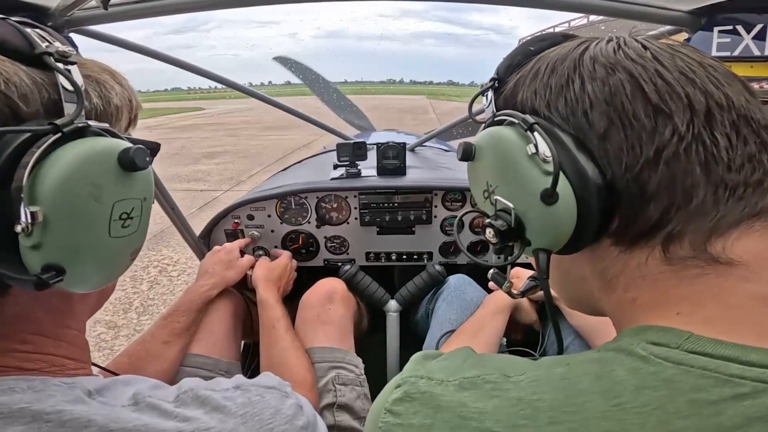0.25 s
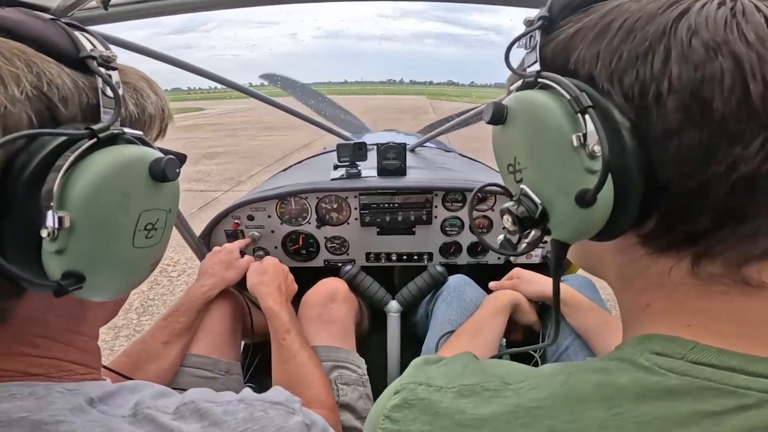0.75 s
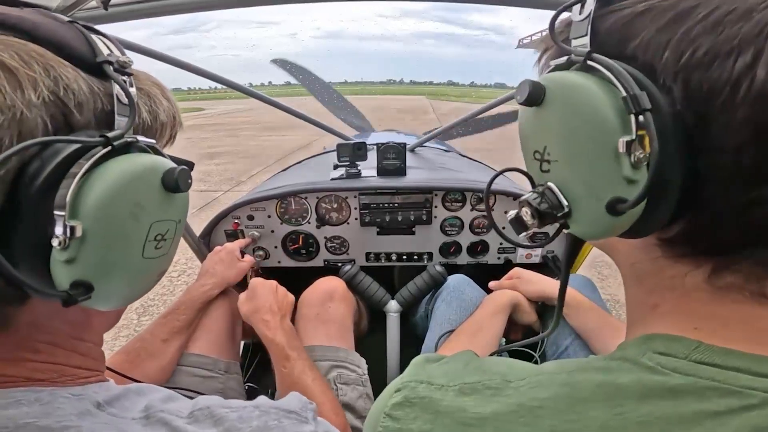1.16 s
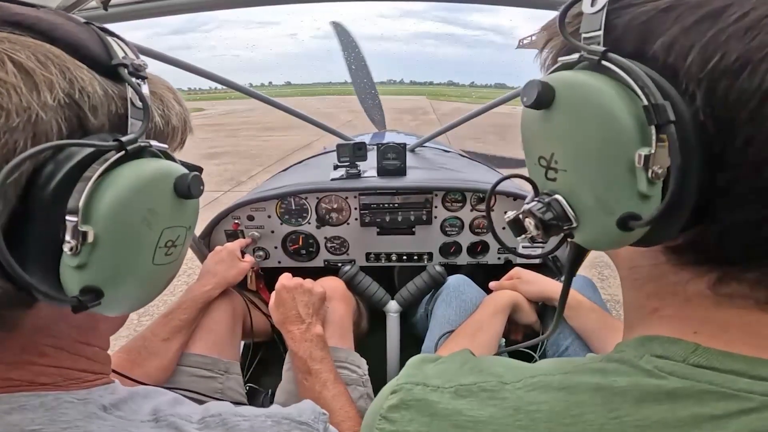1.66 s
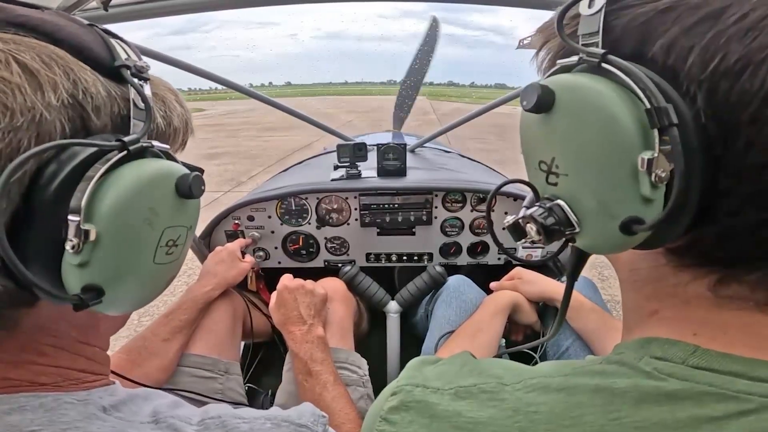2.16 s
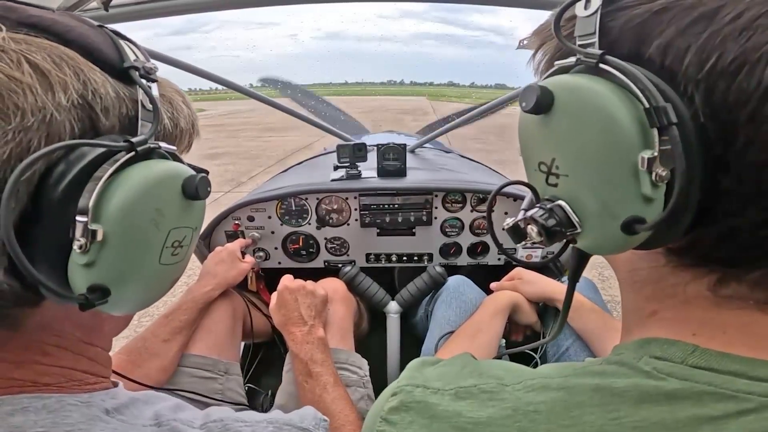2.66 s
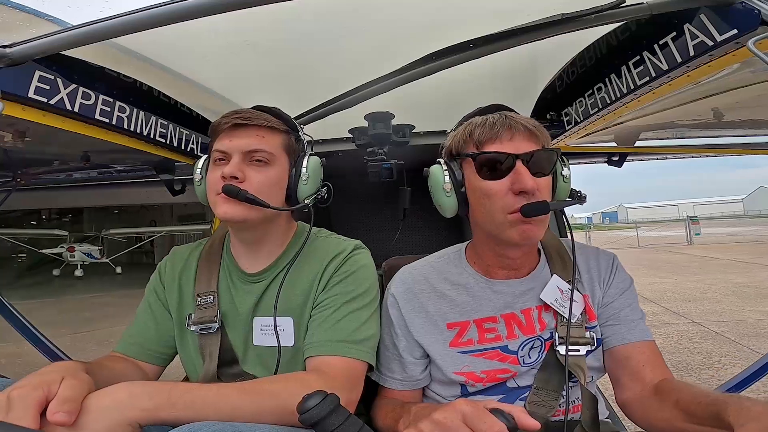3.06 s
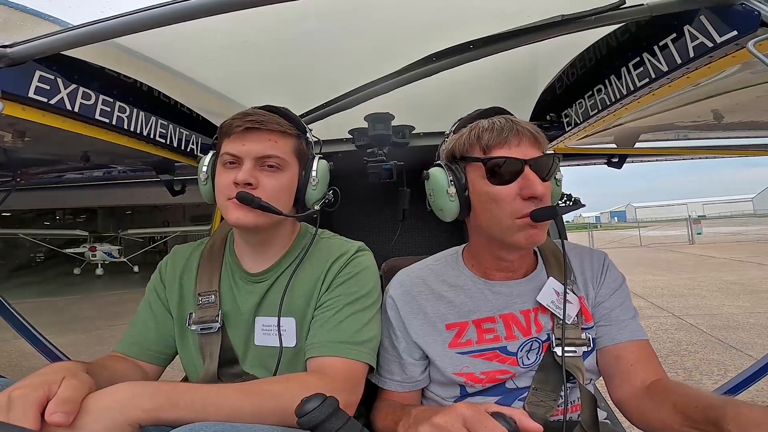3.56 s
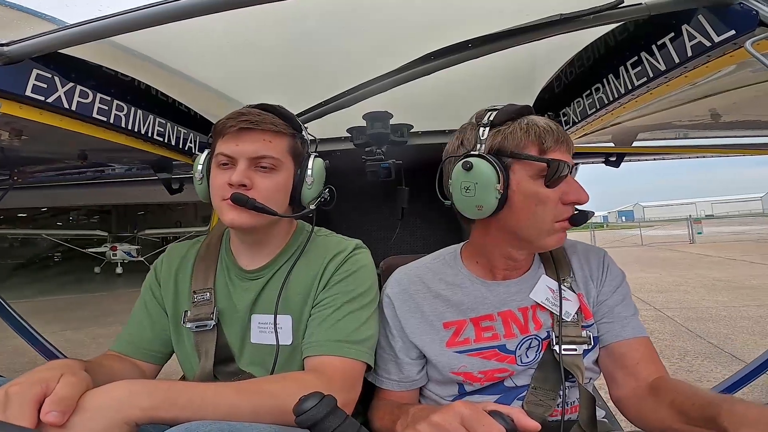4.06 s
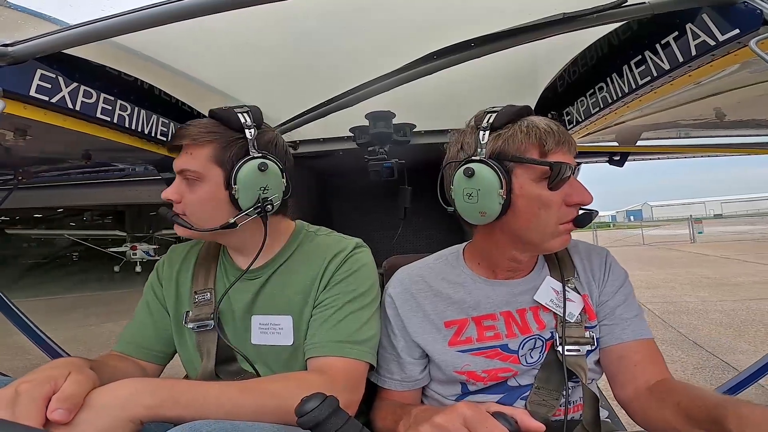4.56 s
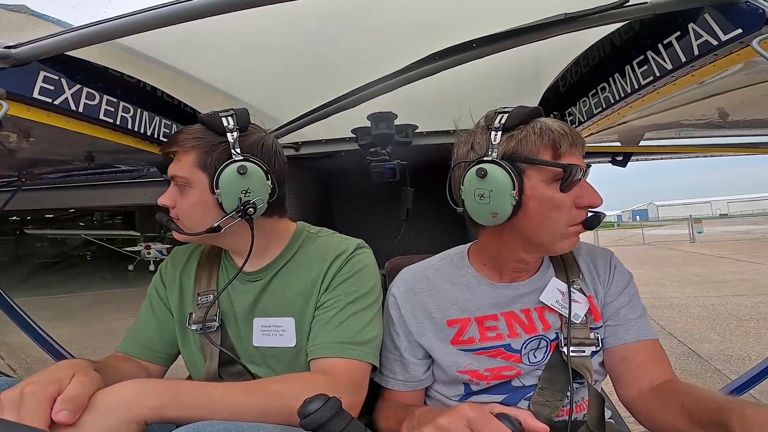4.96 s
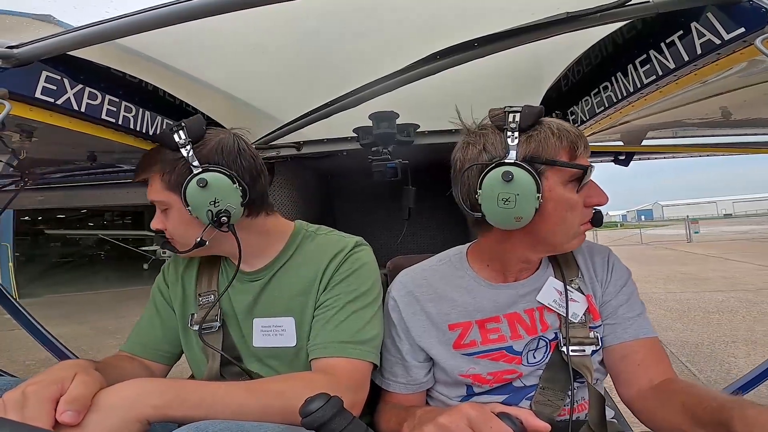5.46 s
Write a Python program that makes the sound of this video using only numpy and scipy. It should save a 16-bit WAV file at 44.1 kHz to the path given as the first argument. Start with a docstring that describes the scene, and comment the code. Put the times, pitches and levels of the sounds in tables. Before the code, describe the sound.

A small propeller plane's engine catches and speeds up with booming and rattling, then abruptly turns duller at a fast idle, heard inside the cabin.

```python
"""A four-cylinder light aircraft engine, heard inside the cabin, in stereo from behind the seats.
It catches and picks up speed: each firing booms, shakes the panels and clatters. The propeller gears
rattle, most while the engine is slow, and then a loose fitting chatters as it speeds up.
Halfway, with a tick, the sound jumps to a dull, nearly mono microphone on the instrument panel.
There the engine runs at a fast idle and sags a little."""
import sys
import numpy as np
from scipy import signal
from scipy.fft import rfft, irfft
from scipy.io import wavfile
from scipy.ndimage import uniform_filter1d

SR = 44100
rng = np.random.default_rng(int(sys.argv[2]) if len(sys.argv) > 2 else 0)


def log_audio(samples):
    """Write samples as a 16-bit WAV file to the path given in sys.argv[1]."""
    # one column per channel
    frames = np.atleast_2d(samples).T
    # limit to full scale, then quantise
    limited = np.clip(frames, -1, 1)
    pcm = np.round(limited * 32767).astype(np.int16)
    wavfile.write(sys.argv[1], SR, pcm)


N = 251370
TIME = np.arange(N) / SR
FREQS = np.maximum(np.arange(N // 2 + 1) * SR / N, 1)
SIDES = np.array([[1], [-1]])   # left, right


# The boom's tones. Each row: multiple of the firing rate, depth of its chugging in dB.
BOOM_TONES = [(.75, 4), (1, 0), (2, 2.5), (2.5, 0.5)]
# Each swells as it passes a cabin resonance. Each row: time in seconds, then each tone's gain in dB.
BOOM_SWELLS = [(0.1, -44, -39, -28, -34.2), (0.3, -42.0, -27, -34, -41), (0.45, -42.0, -26.0, -31.5, -33),
               (0.6, -40, -25.5, -33, -49), (0.75, -42.0, -24.5, -25, -31.5), (1, -48, -25.5, -29.5, -31),
               (1.2, -52, -26.5, -30, -32.9), (1.45, -40, -25.5, -29.5, -30.5),
               (1.62, -39, -22.5, -40, -30.3), (1.8, -33, -22.5, -38, -44), (2, -40, -22, -28, -41),
               (2.2, -32.0, -25, -30, -28), (2.35, -35.5, -20.5, -31, -44), (2.5, -30, -30, -25, -34),
               (2.65, -25.5, -38, -24, -38), (2.76, -25, -27, -25.5, -39)]
def boom(fired):
    """Low tones chug with the uneven combustion. `fired` is the running count of firings."""
    out = from_db(-36.5 + 2 * drift(8.9)) * tone(fired, 1.5)   # a weaker off-beat tone
    for (multiple, chug_db), db in zip(BOOM_TONES, in_time(BOOM_SWELLS)):
        out += from_db(db + 0.96 + chug_db * drift(18)) * tone(fired, multiple)
    return out


# The rumble behind the seats. Each row: frequency in Hz, gain in dB.
REAR_RUMBLE_COLOUR = [(14, -25), (23, 2), (34, -16), (60, 1), (100, -3), (135, -1), (170, -3.5), (280, -4),
                      (330, -5.5), (370, -11.5), (480, -9.5), (550, -18), (620, -19), (720, -53)]
# The engine catches, labours and eases. Each row: time in seconds, gain in dB.
REAR_RUMBLE_SWELLS = [(0, 6.5), (0.14, 3), (0.36, 3.5), (0.5, 0.7), (0.65, -1), (0.76, -0.6), (1.08, -1.5),
                      (1.17, 0.6), (1.35, -2), (1.65, 0), (1.83, -1), (1.95, -1.5), (2.15, 0.3), (2.33, 0),
                      (2.68, 1), (2.82, -1.2)]
def rear_rumble(fired):
    """The firings shake the cabin into a low rumble."""
    shake = bursts(fired, uneven_db=-6, decay_s=0.0066, steady_db=11, jitter_s=0.003)
    shake += from_db(-10) * skin_ring(fired, uneven_db=1, decay_s=0.0075, jitter_s=0.00038)
    swell_db, = in_time(REAR_RUMBLE_SWELLS)
    return from_db(-22.5 + swell_db) * evened(colour(spread(shake), REAR_RUMBLE_COLOUR))


# Clean engine tones. Each row: multiple of the firing rate, level in dB against the rumbling noise.
IDLE_TONES = [(1, -30.5), (2, -22.5), (4, -11), (8, -26), (11, -20.5), (12, -22), (14, -27.5)]
# The rumble at the panel. Each row: frequency in Hz, gain in dB.
PANEL_RUMBLE_COLOUR = [(15, -24), (40, -26), (65, -14), (100, -11.5), (135, -4.5), (190, -1.5), (260, 1),
                       (315, -3.5), (350, -7), (450, -7), (530, -13), (565, -28.5), (620, -12.5),
                       (720, -39)]
# How its low and upper parts churn. Each row: time in seconds, gain in dB.
LOW_SWELLS = [(2.88, 3.5), (2.92, 0.5), (3.03, -2), (3.23, 1.8), (3.29, 3), (3.41, 0), (3.77, 2.5),
              (3.92, -0.6), (4.25, 0.5), (4.35, 1), (4.42, -3.5), (4.51, 4), (4.6, -1), (4.82, -2.6),
              (4.89, 1), (5.03, -6), (5.12, 0.5), (5.25, -3), (5.39, 1.3), (5.52, 0.5), (5.59, -4),
              (5.68, 0.1)]
UPPER_SWELLS = [(2.88, 0.1), (3.06, 1), (3.21, -1.3), (3.39, 1), (3.57, 1), (3.73, -0.2), (3.85, -0.8),
                (3.97, 0.3), (4.12, 0), (4.25, -1), (4.43, 0.9), (4.61, 1.7), (4.77, -0.5), (4.85, 2.2),
                (4.95, -0.7), (5.06, 0.5), (5.12, -1.5), (5.34, -1.2), (5.47, -2), (5.68, -2)]
def panel_rumble(fired, split_hz=225):
    """The idle shakes the cabin; the low and upper rumble swell and sink out of step."""
    tones = sum(from_db(db + 2.3 * drift(4.3)) * tone(fired, multiple) for multiple, db in IDLE_TONES)
    shake = bursts(fired, uneven_db=2.5, decay_s=0.0079, steady_db=4, jitter_s=0.00057)
    shake += from_db(-7.5) * skin_ring(fired, uneven_db=4.5, decay_s=0.021, jitter_s=0.00023)
    rumble = colour(shake[0], PANEL_RUMBLE_COLOUR) + tones
    low = irfft(rfft(rumble) / (1 + (FREQS / split_hz) ** 16), N)
    low_db, upper_db = in_time(LOW_SWELLS) + in_time(UPPER_SWELLS)
    return (from_db(-32 + low_db) * evened(low, window_s=0.14)
            + from_db(-31 + upper_db) * evened(rumble - low, window_s=0.11))


def cabin_drone(fired, rate):
    """The cabin air drones when an engine tone passes through its resonance."""
    air = ring(firings(fired, uneven_db=3.5, jitter_s=0.00016), hz=131, ring_s=0.56)
    return with_speed(rate, -48, db_per_doubling=-7) * surge(db=22, decay_s=1) * rms_one(air)


# The clatter behind the seats. Each row: frequency in Hz, gain in dB.
REAR_CLATTER_COLOUR = [(350, -53), (600, 1), (820, -6.5), (884, -4), (1100, -5), (1280, -9.5), (1390, -7),
                       (1580, -11.5), (2000, -14.5), (2600, -24.5), (4400, -120)]
# Resonances there, shared with the hiss. Each row: centre in Hz, width in Hz, lift in dB.
REAR_RESONANCES = [(1132, 52, 4.5), (2130, 67, 0), (2454, 25, 4), (2570, 54, 1.5), (2740, 61, 3),
                   (3130, 140, 4), (3440, 40, 6.5), (3966, 64, 10.5), (4230, 160, 11.5), (4340, 90, 7),
                   (5470, 100, 9), (6120, 72, 6), (6540, 110, 6), (6680, 74, -12)]
# The clatter's rise and fall. Each row: time in seconds, gain in dB.
REAR_CLATTER_SWELLS = [(0, 4), (0.14, 3.5), (0.23, -4.5), (0.45, -3.5), (0.62, -3), (0.9, -0.3), (1.08, -1),
                       (1.45, -0.6), (1.78, 1.5), (1.9, 1), (2.35, 1), (2.82, 1.9)]
def rear_clatter(fired):
    """The valves clatter with every firing."""
    valves = spread(bursts(fired, uneven_db=4.5, decay_s=0.007, steady_db=4, jitter_s=0.0022))
    swell_db, = in_time(REAR_CLATTER_SWELLS)
    return from_db(-35 + swell_db) * evened(colour(valves, REAR_CLATTER_COLOUR, REAR_RESONANCES))


# The clatter at the panel. Each row: frequency in Hz, gain in dB.
PANEL_CLATTER_COLOUR = [(350, -25.5), (600, -1.5), (734, 1), (804, -3.5), (911, -2.5), (983, -5),
                        (1160, -0.5), (1320, -7), (1520, -4.5), (2000, -14), (2600, -48), (4400, -120)]
# Resonances there, shared with the hiss. Each row: centre in Hz, width in Hz, lift in dB.
PANEL_RESONANCES = [(926, 40, 3.9), (1043, 34, 5.1), (3070, 220, 11), (3820, 210, 5.8), (4620, 200, 5.5)]
# The clatter's rise and fall. Each row: time in seconds, gain in dB.
PANEL_CLATTER_SWELLS = [(2.84, 0.68), (3.1, 1.1), (3.5, 0.29), (3.95, -0.93), (4.3, -0.78), (4.45, -1.6),
                        (4.7, 0.55), (5.1, -0.4), (5.35, 0.23), (5.69, 0.074)]
def panel_clatter(fired):
    """The valves clatter at idle and the cabin skin rings along."""
    valves = bursts(fired, uneven_db=4, decay_s=0.0049, steady_db=6, jitter_s=0.002)
    valves += from_db(-8.5) * skin_ring(fired, uneven_db=6, decay_s=0.0088, jitter_s=0.0001)
    swell_db, = in_time(PANEL_CLATTER_SWELLS)
    return from_db(-38.5 + swell_db) * colour(valves[0], PANEL_CLATTER_COLOUR, PANEL_RESONANCES)


# Raps that stand out of the clatter. Each row: start in seconds, relative level in dB.
RAPS = [(0.048, -19), (0.16, -22), (0.306, -25.5), (0.757, -24.5), (0.898, -20), (1.079, -21),
        (1.193, -26.5), (1.299, -25.5), (1.364, -22.5), (1.547, -23), (1.721, -24.5), (1.787, -19),
        (1.868, -30), (1.992, -23), (2.062, -22), (2.125, -24.5), (2.271, -21.5), (2.33, -25.5),
        (2.376, -23.5), (2.433, -18.5), (2.816, -21.5), (2.898, -23.5), (2.94, -24), (3.083, -21.5),
        (3.181, -25), (3.403, -25.5), (3.575, -30), (4.54, -23.5), (4.63, -25), (4.697, -22.5),
        (4.831, -24), (4.857, -26), (4.897, -28.5), (5.369, -26), (5.416, -23.5), (5.64, -25)]
# The sound of a rap. Each row: frequency in Hz, gain in dB.
RAP_COLOUR = [(250, 1.5), (450, 0.5), (700, 7), (850, 2), (1130, 6), (1350, -6), (1600, -3.5),
              (2100, -10.5), (3200, -22)]
def hard_firings(decay_s):
    """Now and then a cylinder fires harder and raps the firewall."""
    start_s, level_db = np.transpose(RAPS)
    return puffs(clicks_at(start_s, level_db), decay_s, RAP_COLOUR)


# Heavy lumps of combustion. Each row: start in seconds, strength in dB.
LUMPS = [(0.1, -36), (0.304, -19), (0.345, -20), (.47, -16), (.545, -13.5), (0.646, -13.5), (.685, -19),
         (1.145, -27), (1.809, -16), (2.114, -21.5), (2.703, -22), (2.897, -21), (2.94, -20), (3.224, -20),
         (3.285, -22), (3.337, -19), (3.574, -16), (3.759, -26), (3.994, -24), (4.09, -19.5), (4.475, -20),
         (4.713, -20), (5.044, -21), (5.245, -25.5)]
# The notes of the cabin skin. Each row: pitch in Hz, gain in dB, ring time in seconds.
SKIN_NOTES = [(161, -11.5, 0.046), (216, -11, 0.078), (272.6, -5, 0.13), (301, -9.5, 0.17),
              (426, -13, 0.06)]
def thumps(vary_db=2.5):
    """Each lump thumps the cabin skin, ringing every note with a strength of its own."""
    start_s, strength_db = np.transpose(LUMPS)
    out = 0
    for hz, gain_db, ring_s in SKIN_NOTES:
        chance_db = vary_db * np.clip(rng.standard_normal(len(start_s)), -2, 2)
        out = out - ring(clicks_at(start_s, strength_db + gain_db + chance_db), hz, ring_s)
    return signal.sosfilt(signal.butter(2, [120, 1500], "band", fs=SR, output="sos"), out)


# Loud knocks. Each row: start in seconds, strength in dB, left over right in dB,
# pitch of its chink in Hz, level of the chink in dB against the knock.
LOUD_KNOCKS = [(.002, -18.5, 7, 3380, -17), (0.02, -26, 3, 4440, 2), (0.04, -25, 10, 2180, -5),
               (.0672, -27.5, 14, 2180, 1), (.0844, -25, 11, 2217, 0), (0.1088, -28, 12, 2190, -8),
               (.135, -31, 5, 3640, -5), (0.163, -25.5, 10, 2126, -5), (0.1747, -32, 5, 2480, -10),
               (0.186, -27, 8, 2300, -9), (0.2196, -34, 8, 7100, -15), (0.263, -34, 9, 7060, -12),
               (.3222, -33, 8, 2000, -5.5), (0.341, -27, 8, 6900, -16), (.356, -35, 4, 6800, -10),
               (0.3897, -25.5, 7.5, 2840, -6), (.4272, -26.5, 9, 2100, -13), (.4494, -33.5, 11, 2180, -7),
               (.4888, -32, 10, 2490, -12), (.5, -32.5, 6, 2170, -4), (.517, -31, 10, 2820, -2),
               (0.539, -29.5, 7, 2730, -12), (0.571, -30, 3, 3400, -11), (.6325, -33, 4, 2100, -4),
               (0.6454, -36, 8, 2100, -5), (.6719, -31, 12, 2110, -0.5), (0.693, -28, 8, 6900, -19),
               (.7168, -32, 8, 2100, -1), (.738, -29, 9, 2650, 2), (0.755, -27.5, 7, 6800, -12.5),
               (0.785, -27, 7, 2640, -9), (.8285, -44, 5, 5700, -12), (.8572, -26, 9, 2510, -5),
               (.9248, -34.5, 9, 7100, -14), (0.969, -27.5, 6, 7000, -20), (1.011, -42, 4, 7100, -10),
               (1.4145, -29, 4, 6800, -18), (1.5029, -35, 2, 3410, -8), (1.6764, -29, 0, 4008, -14),
               (1.7234, -39, 0, 6000, -7), (1.8092, -33, 9, 3400, -12), (1.852, -33, 3, 4500, -13),
               (1.938, -32, 2, 5900, -17), (2.0656, -31, 6, 2827, -6), (2.14, -25, 3.5, 2160, -4),
               (2.208, -25.5, 4, 6695, -18), (2.31, -29, 6, 6900, -18), (2.3517, -30, 7, 6000, -12),
               (2.392, -26, 5, 3150, -9), (2.4847, -42, 1, 4000, -12), (2.58, -30, 3, 2794, -9),
               (2.676, -30, 12, 2760, -2), (2.696, -33, 5, 6500, -8)]
# The notes of the gear case. Each row: pitch in Hz, gain in dB, ring time in seconds.
CASE_NOTES = [(2160, 9.5, 0.062), (2537, -1, 0.17), (2670, 6, 0.04), (2815, 14, 0.016), (3100, -15, 0.028),
              (3350, 1, 0.042), (3730, 0, .02), (3930, 10, 0.011), (4270, -15, .025), (4450, -5, 0.057),
              (4600, -10, .02), (5700, -30, .025), (6200, -11, .025), (6650, -7, .02), (6750, -4, 0.02),
              (7750, -20, .02)]
# The crack of a knock. Each row: frequency in Hz, gain in dB.
CRACK_COLOUR = [(1200, -32), (2100, 2.5), (3000, -0.5), (4600, 0), (5500, -8.5), (7800, -7), (9500, -22),
                (12800, -21.5), (14300, -55)]
def gear_knocks(ring_db=-22, crack_db=-11, vary_db=1.5, bounce_db=-4, chink_ring_s=0.038):
    """Gear teeth knock through their slack: each cracks, bounces once, rings the case and chinks."""
    start_s, strength_db, pan_db, chink_hz, chink_db = np.vstack([LOUD_KNOCKS, light_knocks()]).T
    hits = (start_s * SR).astype(int)
    bounces = hits + (rng.uniform(0.00202, 0.011, len(hits)) * SR).astype(int)
    touches = np.append(hits, bounces)
    strength = from_db(strength_db + pan_db * SIDES / 2)
    clicks = np.zeros((2, N))
    clicks[:, hits] = strength
    clicks[:, bounces] += from_db(bounce_db) * strength
    softened = uniform_filter1d(clicks, size=36)
    out = from_db(crack_db) * puffs(softened, decay_s=0.0042, spectrum=CRACK_COLOUR)
    for hz, gain_db, ring_s in CASE_NOTES:
        chance = np.clip(rng.standard_normal((len(touches), 3)).T, -2, 2)
        struck = np.zeros((2, N))
        struck[:, touches] = clicks[:, touches] * from_db(vary_db * chance[0]) * np.sign(chance[1:])
        out += from_db(ring_db + gain_db) * ring(struck, hz, ring_s)
    age = TIME[:SR // 5]
    envelope = from_db(-60 * age / chink_ring_s) * (1 - np.exp(-age / 0.001))
    for at, sides, hz, db in zip(hits, strength.T, chink_hz, chink_db):
        chink = from_db(db) * envelope * np.sin(2 * np.pi * hz * age)
        out[:, at:at + len(age)] += np.outer(sides, chink)
    return out


# Spells of light rattling. Each row: start and end in seconds, strength in dB, left over right in dB.
RATTLE_SPELLS = [(0, 0.039, -31, 0), (0.052, 0.103, -35, -1), (0.113, 0.197, -37, 4),
                 (0.334, 0.994, -40, 0), (2.05, 2.797, -37, 2)]
def light_knocks(count=10, vary_db=2, chink_db=-5.5):
    """Each spell scatters faint knocks that chink at a note of the case; gives rows like LOUD_KNOCKS."""
    rows = []
    for start, end, strength_db, pan_db in RATTLE_SPELLS:
        when = (np.arange(count) + rng.random(count)) / count
        softer_db, lean_db = vary_db * rng.standard_normal((count, 2)).T
        note_hz = np.array(CASE_NOTES)[rng.integers(len(CASE_NOTES), size=count), 0]
        rows.append(np.column_stack([start + when * (end - start), strength_db - softer_db,
                                     pan_db + lean_db, note_hz, np.full(count, chink_db)]))
    return np.vstack(rows)


# Bursts of chatter. Each row: start in seconds, length in seconds, relative level in dB, pitch in Hz.
FITTING_CHATTERS = [(1.052, 0.015, -45, 4400), (1.239, 0.024, -53.5, 7500), (1.37, 0.025, -53, 6930),
                    (1.755, 0.039, -45, 4720), (1.927, 0.023, -54, 5800), (2.013, 0.023, -51, 4700),
                    (2.092, 0.028, -42.5, 4030), (2.172, 0.033, -43, 3930), (2.249, 0.041, -43, 4170),
                    (2.329, 0.025, -44, 4520), (2.405, 0.041, -41, 3740), (2.554, 0.033, -44, 4700),
                    (2.631, 0.016, -44, 3740), (2.686, .05, -51, 4080), (2.772, 0.022, -56, 5340)]
# The fitting's notes. Each row: multiple of its pitch, gain in dB, ring time in seconds.
FITTING_NOTES = [(.68, 2, 0.015), (.93, 3, 0.015), (1.04, -1, 0.023), (1.2, -4, 0.0096), (1.55, -4, 0.0047)]
def loose_fitting(count=8, samples=5000, tick_db=11, carry_db=0.8):
    """The engine shakes a fitting: runs of tiny contacts swell and die, ticking and ringing it."""
    out = np.zeros((2, N))
    for start_s, length_s, db, hz in FITTING_CHATTERS:
        when = (np.arange(count) + rng.random(count)) / count
        force = rng.standard_normal(count) + rng.standard_normal((2, count))   # shared + each side's own
        contacts = np.zeros((2, samples))
        contacts[:, (when * length_s * SR).astype(int)] = np.sqrt(np.sin(np.pi * when)) * force
        ringing = sum(from_db(gain_db) * ring(contacts, multiple * hz, ring_s)
                      for multiple, gain_db, ring_s in FITTING_NOTES)
        run = rms_one(from_db(tick_db) * contacts + ringing)
        at = int(start_s * SR)
        out[:, at:at + samples] += from_db(db + carry_db) * np.sqrt(length_s * SR / samples) * run
    return signal.sosfilt(signal.butter(4, 8300, fs=SR, output="sos"), out)   # slightly soft contacts


# The hum fades while the idle labours. Each row: time in seconds, level in dB.
HUM_SWELLS = [(2.83, -44.5), (3.15, -36), (3.35, -44), (3.7, -37), (3.9, -39), (4.2, -40.5), (4.3, -49),
              (4.85, -50), (5.0, -41.5), (5.7, -40.5)]
def shaft_hum(fired):
    """A geared shaft hums with a wavering level."""
    level_db, = in_time(HUM_SWELLS)
    return from_db(level_db + drift(12)) * tone(fired, multiple=1.61)


# The hiss behind the seats. Each row: frequency in Hz, gain in dB.
REAR_HISS_COLOUR = [(1180, 1), (2000, -6), (2140, 1), (2370, -4), (3150, -0.5), (3550, -4), (3890, -3),
                    (4200, -16.5), (4610, -2), (5410, -12), (7580, -10), (9510, -20.5), (12300, -29),
                    (15000, -55)]
# Its rise and fall. Each row: time in seconds, gain in dB.
HISS_SWELLS = [(0.25, -7.5), (0.32, -8), (0.37, -2), (0.47, -5.5), (0.54, 1), (0.61, -2.6), (0.78, 1),
               (1.11, -2), (1.24, -0.5), (1.29, -3.5), (1.39, 0), (1.46, -2.5), (1.57, 0.7), (1.82, 1.5),
               (1.99, 1), (2.2, 1.5), (2.46, 1.5), (2.61, 0), (2.69, 4.7), (2.77, 2)]
def rear_hiss(fired, rate):
    """A soft, uneven rasp follows each firing."""
    rasp = bursts(fired, uneven_db=3, decay_s=0.011, steady_db=1, jitter_s=0.0065, rise_s=0.00073)
    swell_db, = in_time(HISS_SWELLS)
    gain = with_speed(rate, -45 + swell_db, db_per_doubling=3) * surge(db=10.5, decay_s=0.38)
    return gain * evened(colour(spread(rasp), REAR_HISS_COLOUR, REAR_RESONANCES), window_s=0.09)


# The hiss at the panel. Each row: frequency in Hz, gain in dB.
PANEL_HISS_COLOUR = [(1800, -31.5), (2000, -3.5), (2200, 3), (2450, -5), (2800, -8.5), (3500, -10.5),
                     (4200, -9), (4900, -13), (5300, -19), (5800, -29), (7500, -37), (15000, -46.5)]
def panel_hiss(fired, rate):
    """The valve train ticks once for each firing, over a steady hiss."""
    ticks = bursts(fired, uneven_db=2, decay_s=0.005, steady_db=7, jitter_s=0.001)
    hiss = colour(ticks[0], PANEL_HISS_COLOUR, PANEL_RESONANCES)
    return with_speed(rate, -53, db_per_doubling=11) * hiss


# The notes of the rocker covers. Each row: pitch in Hz, relative level in dB, ring time in seconds.
COVER_NOTES = [(3050, -62.5, .016), (3170, -64.5, 0.021), (3970, -69, .018), (4550, -67.5, 0.024)]
def rocker_taps(fired, rate):
    """The rockers, the levers that open the valves, tap loosely and ring their covers."""
    taps = sum(from_db(db) * rms_one(ring(firings(fired, uneven_db=3.5, jitter_s=0.004), hz, ring_s))
               for hz, db, ring_s in COVER_NOTES)
    return with_speed(rate, -1.2, db_per_doubling=24) * taps


# The deep flutter of blown air. Each row: frequency in Hz, gain in dB.
WASH_COLOUR = [(15, -4), (40, 6), (70, 5), (105, -4.5), (135, -16), (170, -30.5)]
def propeller_wash():
    """Air from the propeller buffets the two openings of the panel microphone."""
    return from_db(-51.5) * colour(rng.standard_normal((2, N)), WASH_COLOUR)


# The very top of the hiss. Each row: frequency in Hz, gain in dB.
SIZZLE_COLOUR = [(8800, -1), (10500, -2), (12000, 0), (13000, -5), (14000, -22)]
# Its rise and fall. Each row: time in seconds, gain in steps of 1.2 dB.
SIZZLE_SWELLS = [(0.25, -2.3), (0.28, -4.3), (0.41, -5), (0.64, -2.2), (0.71, -1), (0.85, 0), (1.05, -3),
                 (1.26, -3.5), (1.3, -7), (1.43, 3), (1.52, -2.0), (1.64, -0.3), (1.82, -4), (1.88, 4.5),
                 (2.21, 3.6), (2.49, 1), (2.57, 4), (2.77, 1.2)]
def sizzle():
    """A faint, fine sizzle comes and goes behind the seats."""
    swell, = in_time(SIZZLE_SWELLS)
    return from_db(-67.5 + 1.2 * swell) * colour(spread(rng.standard_normal((2, N))), SIZZLE_COLOUR)


def firings(fired, uneven_db, jitter_s):
    """One click for each firing, none quite as strong or as punctual as the last."""
    due = np.flatnonzero(np.diff(np.floor(fired)))
    lateness, strength = rng.standard_normal((500, 2))[:len(due)].T
    at = np.clip(due + (lateness * jitter_s * SR).astype(int), 0, N - 1)
    clicks = np.zeros(N)
    clicks[at] = from_db(uneven_db * np.clip(strength, -2, 2))
    return clicks


def bursts(fired, uneven_db, decay_s, steady_db, jitter_s, rise_s=0.0022):
    """Two unrelated noises that flare with every firing over a steady wash."""
    flare = rms_one(fade(fade(firings(fired, uneven_db, jitter_s), decay_s), rise_s))
    return rms_one(np.sqrt(flare ** 2 + from_db(steady_db) ** 2) * rng.standard_normal((2, N)))


def skin_ring(fired, uneven_db, decay_s, jitter_s):
    """Every firing sets the same dense ring going in the thin cabin skin, giving faint harmonics."""
    response = rfft(rng.standard_normal((2, N)) * np.exp(-TIME / decay_s))
    response /= np.sqrt(uniform_filter1d(np.abs(response) ** 2, size=500))   # flatten broad humps
    return rms_one(irfft(rfft(firings(fired, uneven_db, jitter_s)) * response, N))


def tone(fired, multiple):
    """A sine at a multiple of the firing rate, locked to the crankshaft."""
    return np.sqrt(2) * np.sin(2 * np.pi * (multiple * fired + rng.random()))


def with_speed(rate, db, db_per_doubling):
    """A gain that follows engine speed; it equals `db` at 46 firings a second."""
    return from_db(db + db_per_doubling * np.log2(rate / 46))


def surge(db, decay_s):
    """Extra gain at first, while the engine catches and shudders."""
    return from_db(db * np.exp(-(TIME / decay_s) ** 2))


def clicks_at(start_s, level_db):
    """Single clicks at the given times and levels."""
    clicks = np.zeros(N)
    clicks[(start_s * SR).astype(int)] = from_db(level_db)
    return clicks


def puffs(clicks, decay_s, spectrum):
    """Each click lets off a short burst of shaped noise, in two unrelated channels."""
    burst = fade(clicks, decay_s) * rng.standard_normal((2, N))
    return np.std(burst) * colour(burst, spectrum)


def ring(clicks, hz, ring_s):
    """Each click sets a sine ringing, which falls by 60 dB in the ring time."""
    decay, angle = from_db(-60 / (ring_s * SR)), 2 * np.pi * hz / SR
    return signal.lfilter([0, np.sin(angle)], [1, -2 * decay * np.cos(angle), decay ** 2], clicks + 1e-18)


def fade(clicks, decay_s):
    """Give each click a tail that dies away."""
    return signal.lfilter([1], [1, -np.exp(-1 / (decay_s * SR))], clicks + 1e-18)


def drift(hz):
    """A random wobble of about size 1, mostly slower than `hz`."""
    return rms_one(irfft(rfft(rng.standard_normal(N)) / (1 + (FREQS / hz) ** 4), N))


def colour(x, spectrum, resonances=()):
    """Shape a sound by a spectrum and resonances, cut steeply beyond its ends, and scale it to 1."""
    lift_db = sum(db / (1 + (2 * (FREQS - centre) / width) ** 2) for centre, width, db in resonances)
    edges = np.minimum(1, np.minimum(FREQS / spectrum[0][0], spectrum[-1][0] / FREQS)) ** 4
    return rms_one(irfft(rfft(x) * from_db(over_hz(spectrum) + lift_db) * edges, N))


def evened(x, window_s=0.18):
    """Take the slow swells out of a noise and leave its quick flutter."""
    power = np.mean(np.atleast_2d(x) ** 2, axis=0)
    return rms_one(x / np.sqrt(uniform_filter1d(power, size=int(window_s * SR)) + 1e-12))


# How alike the two sides are behind the seats. Each row: frequency in Hz, likeness (1 is identical).
SIDE_LIKENESS = [(60, 0.97), (200, 1), (400, 0.98), (700, 0.95), (1300, 0.84), (2400, 0.62), (4400, 0.46),
                 (8000, 0.44), (15000, 0)]
# Which side is louder. Each row: frequency in Hz, left over right in dB.
SIDE_BALANCE = [(200, 0), (700, 1), (1300, 2.5), (2200, 3), (3000, 5), (4400, 0), (8000, -2), (13000, 2)]
def spread(pair, left_lag_s=0.00004):
    """Two unrelated noises become left and right: alike in the bass, apart in the treble."""
    alike = over_hz(SIDE_LIKENESS)
    mid, side = rfft(pair)
    both = np.sqrt(1 + alike) * mid + np.sqrt(1 - alike) * side * SIDES
    both[0] *= np.exp(-2j * np.pi * FREQS * left_lag_s)
    return irfft(both * from_db(over_hz(SIDE_BALANCE) * SIDES / 2), N)


def in_time(rows):
    """Join timed rows into a list of curves, one for each column after the time."""
    seconds, *columns = np.transpose(rows)
    return [np.interp(TIME, seconds, column) for column in columns]


def over_hz(points):
    """Join points into a curve over frequency, with octaves evenly spaced."""
    hz, value = np.transpose(points)
    return np.interp(np.log(FREQS), np.log(hz), value)


def from_db(db):
    """Turn decibels into a gain."""
    return 10 ** (np.asarray(db) / 20)


def rms_one(x):
    """Scale a signal to an average power of 1."""
    return x / np.sqrt(np.mean(x ** 2) + 1e-20)


# The engine picking up. Each row: time in seconds, firings per second.
RUN_UP_SPEED = [(0, 33), (.2, 34.3), (.35, 38.4), (.6, 41.4), (.87, 45), (1.25, 46.7), (1.61, 45.2),
                (1.95, 47.4), (2.25, 51.7), (2.48, 53), (2.82, 57.6)]
def behind_seats():
    """The engine gathering speed, in stereo with a deep boom."""
    rate, = in_time(RUN_UP_SPEED)
    fired = np.cumsum(rate) / SR
    engine = cabin_drone(fired, rate) + rear_rumble(fired) + rear_clatter(fired)
    raps = from_db(-9) * spread(hard_firings(decay_s=0.009))
    hiss = rear_hiss(fired, rate) + sizzle()
    return engine + raps + hiss + gear_knocks() + boom(fired) + loose_fitting()


# The idle sagging. Each row: time in seconds, firings per second.
IDLE_SPEED = [(2.83, 49.6), (3.2, 49.55), (3.45, 48.5), (3.68, 48.1), (3.87, 47), (4.25, 46.4), (4.5, 45.6),
              (4.8, 44.8), (5.2, 44.4), (5.7, 44.5)]
def on_panel():
    """The fast idle, nearly mono, with thin bass and little treble."""
    rate, = in_time(IDLE_SPEED)
    fired = np.cumsum(rate) / SR
    engine = shaft_hum(fired) + panel_rumble(fired) + panel_clatter(fired)
    raps = from_db(-4) * hard_firings(decay_s=0.0051)[0]
    hiss, wash = panel_hiss(fired, rate), propeller_wash()
    microphone_noise = from_db(-76.5) * rng.standard_normal((2, N))
    return engine + raps + hiss + rocker_taps(fired, rate) + wash + microphone_noise


def scene(switch_s=2.8265):
    """One microphone, a tick at the switch, then the other; thumps run through both."""
    panel_share = np.clip((TIME - switch_s) * 1000 + 0.5, 0, 1)   # changes over in a millisecond
    tick = from_db(-13.5) * np.exp(-np.abs(TIME - switch_s) / 0.00056) * (TIME < switch_s)
    return (1 - panel_share) * behind_seats() + panel_share * on_panel() + thumps() + tick


def record(dry):
    """Cut the highest treble, by at least 60 dB from 16300 Hz up."""
    return signal.sosfilt(signal.cheby2(14, 60, 16300, fs=SR, output="sos"), dry)


dry = scene()
out = record(dry)
log_audio(out)
```